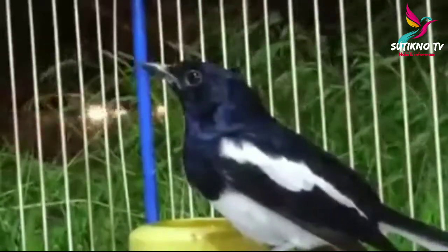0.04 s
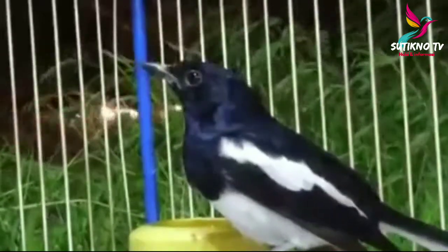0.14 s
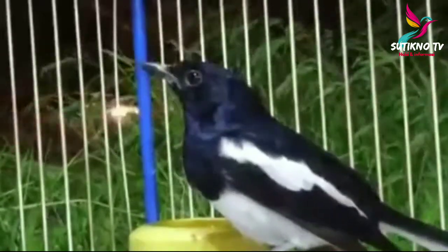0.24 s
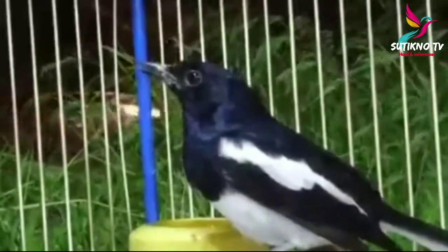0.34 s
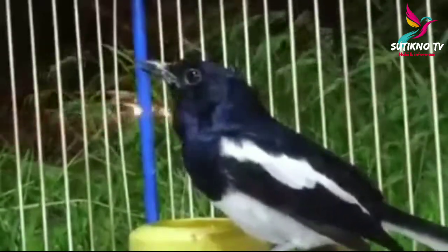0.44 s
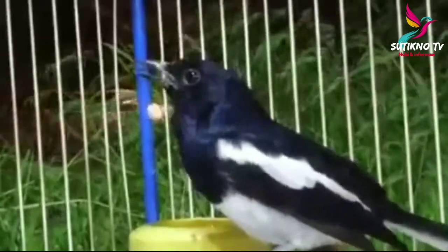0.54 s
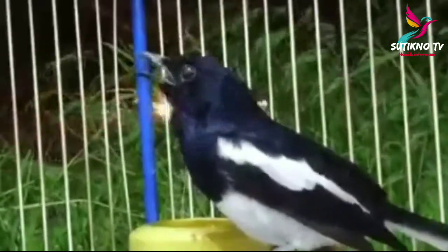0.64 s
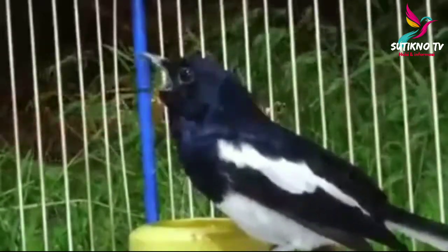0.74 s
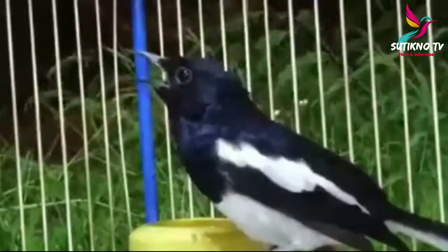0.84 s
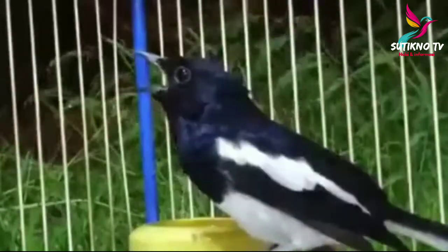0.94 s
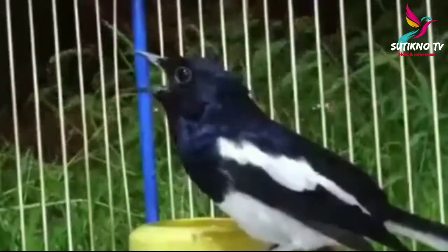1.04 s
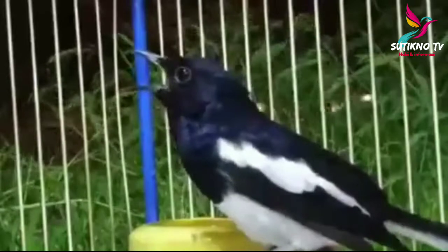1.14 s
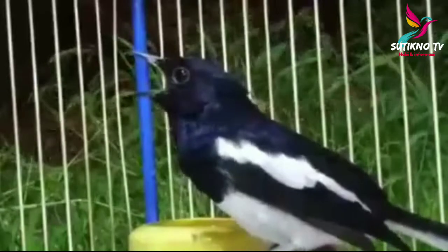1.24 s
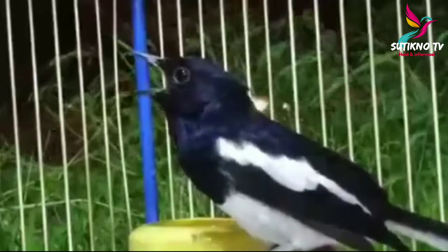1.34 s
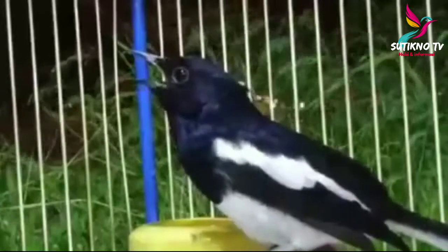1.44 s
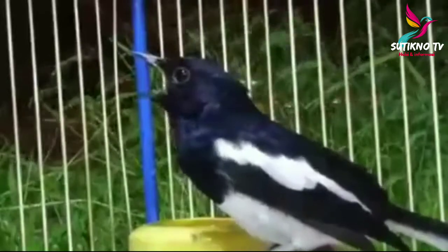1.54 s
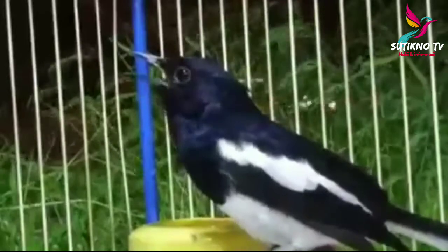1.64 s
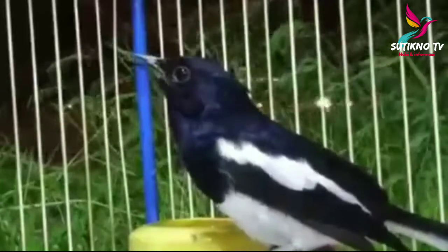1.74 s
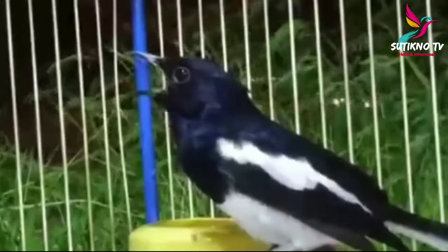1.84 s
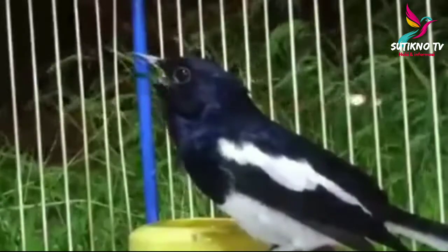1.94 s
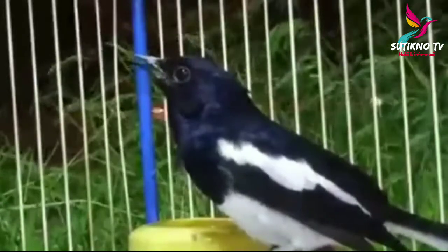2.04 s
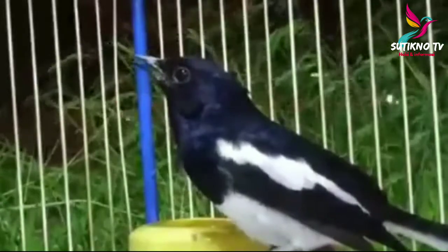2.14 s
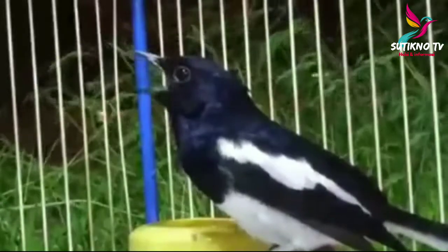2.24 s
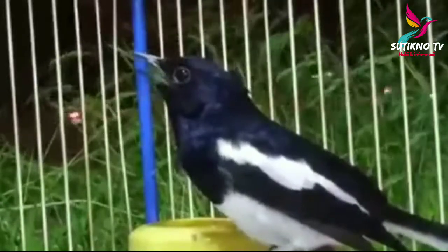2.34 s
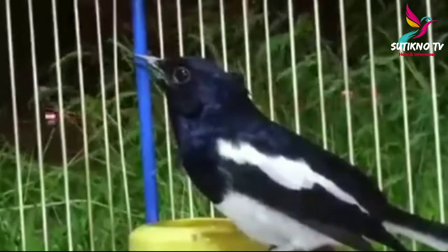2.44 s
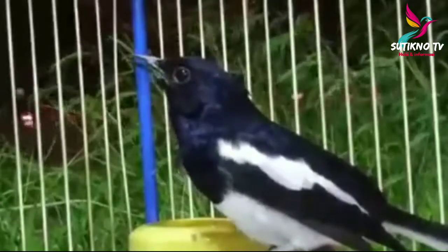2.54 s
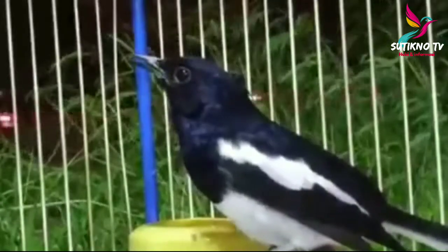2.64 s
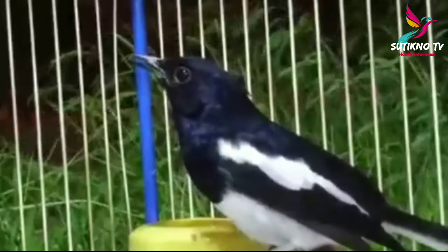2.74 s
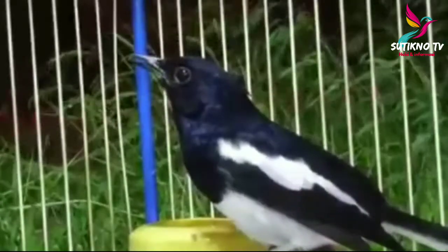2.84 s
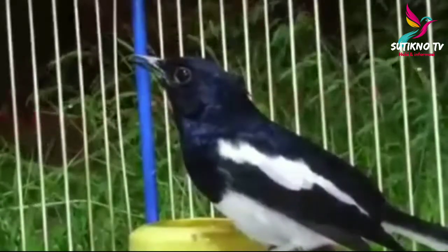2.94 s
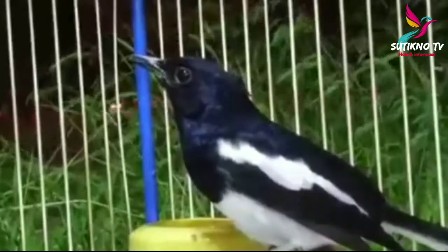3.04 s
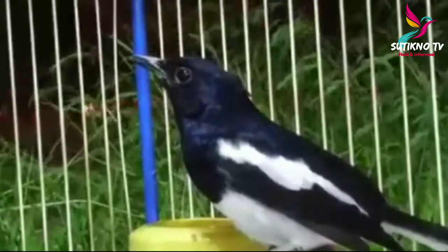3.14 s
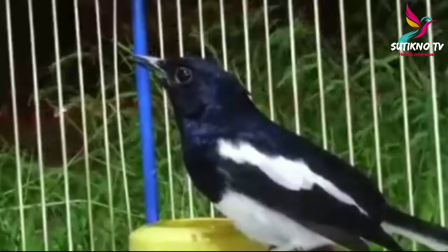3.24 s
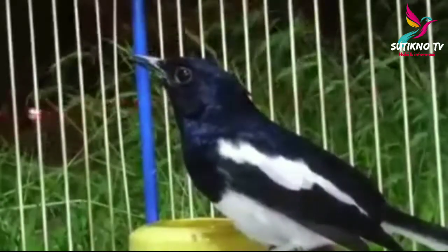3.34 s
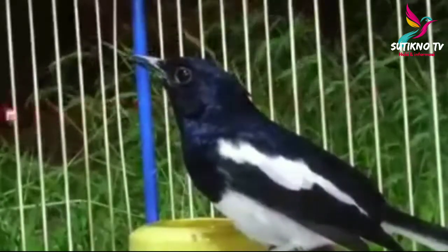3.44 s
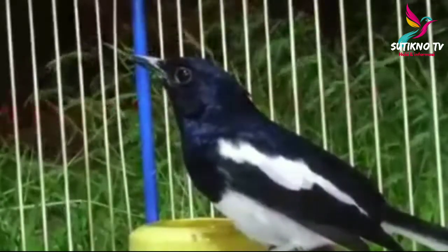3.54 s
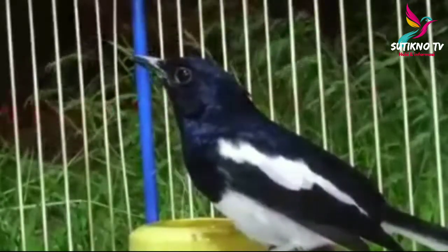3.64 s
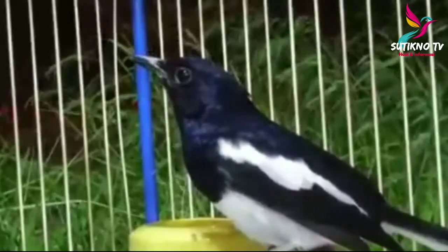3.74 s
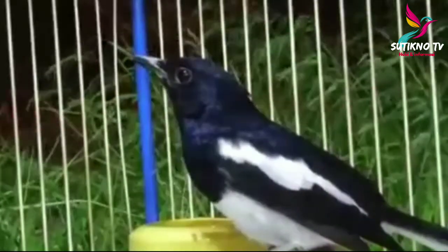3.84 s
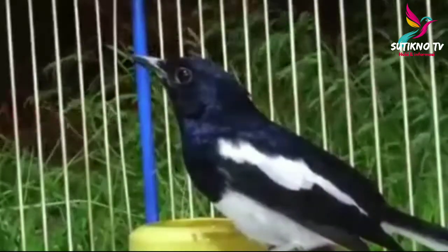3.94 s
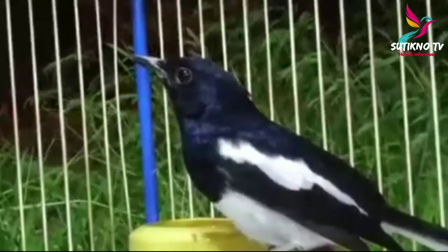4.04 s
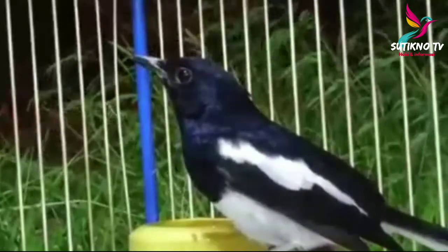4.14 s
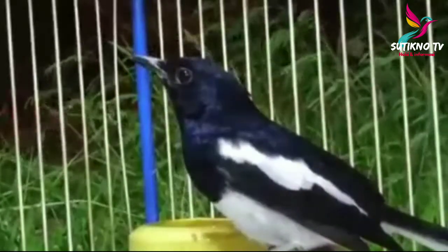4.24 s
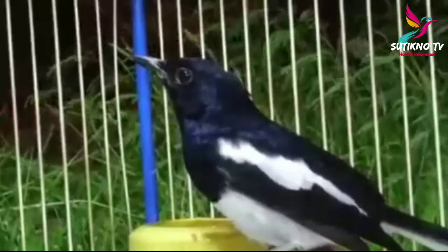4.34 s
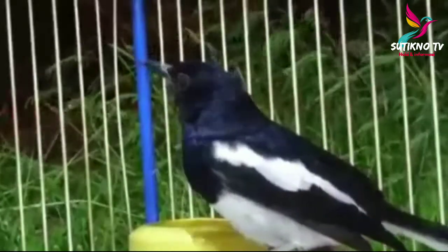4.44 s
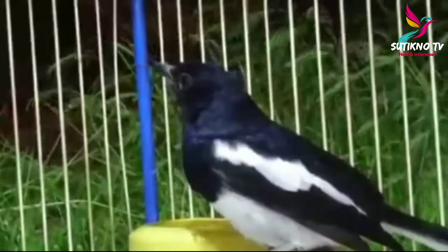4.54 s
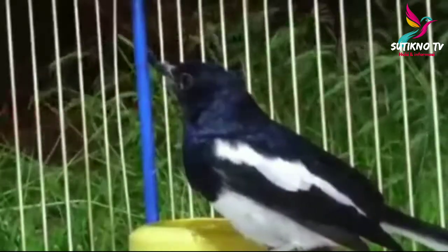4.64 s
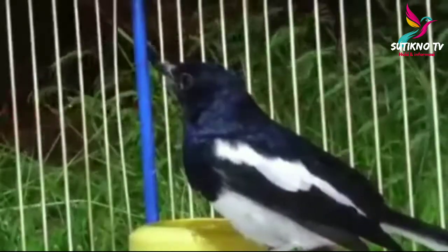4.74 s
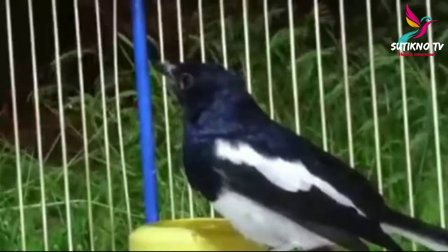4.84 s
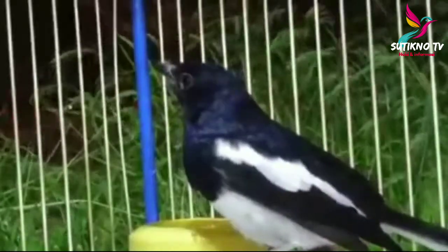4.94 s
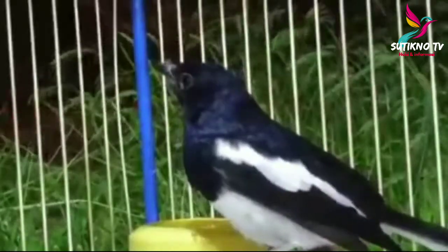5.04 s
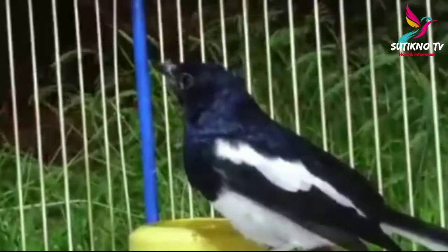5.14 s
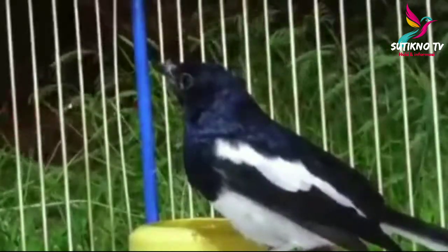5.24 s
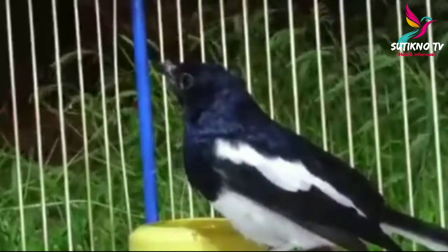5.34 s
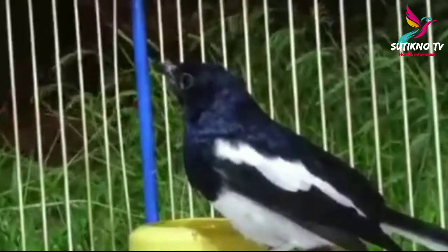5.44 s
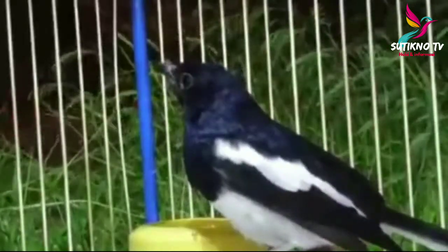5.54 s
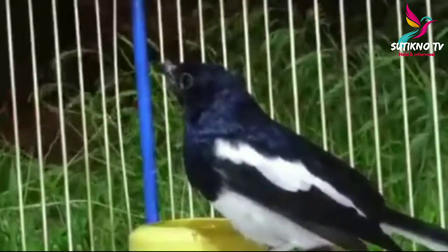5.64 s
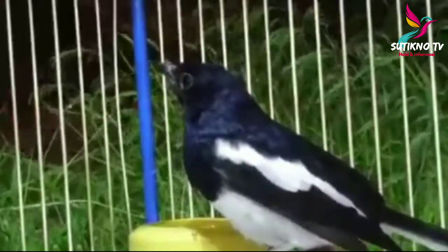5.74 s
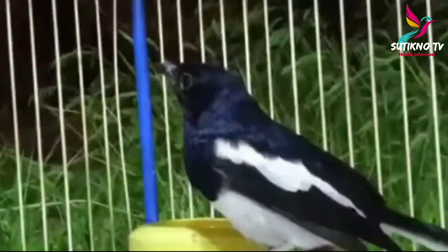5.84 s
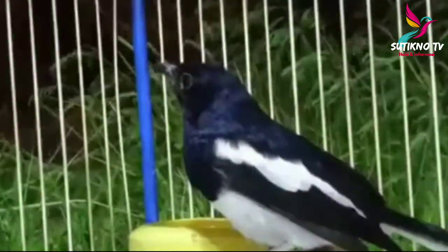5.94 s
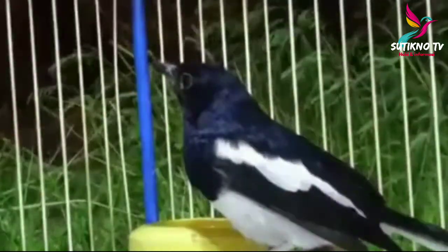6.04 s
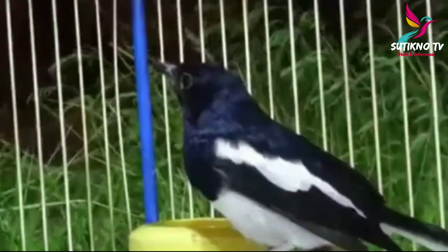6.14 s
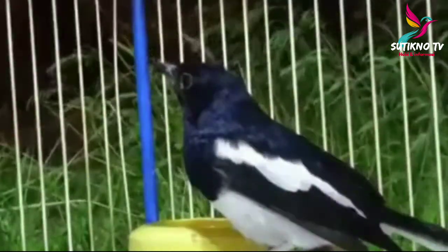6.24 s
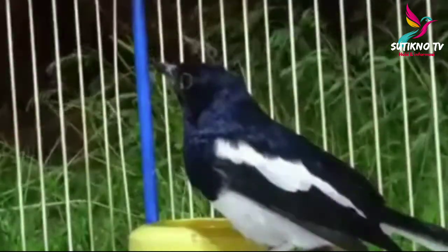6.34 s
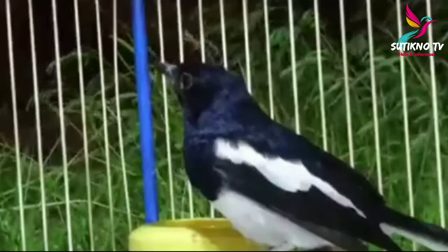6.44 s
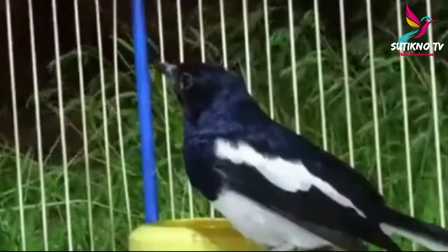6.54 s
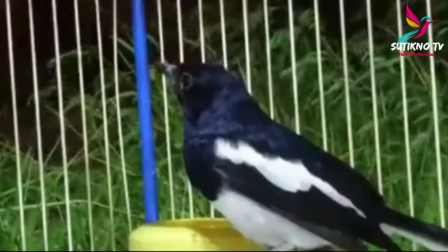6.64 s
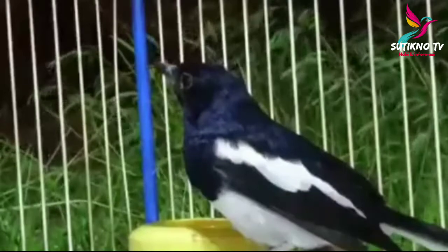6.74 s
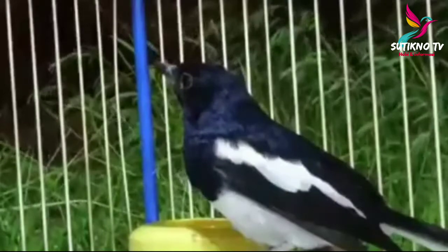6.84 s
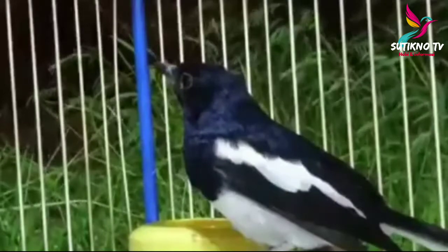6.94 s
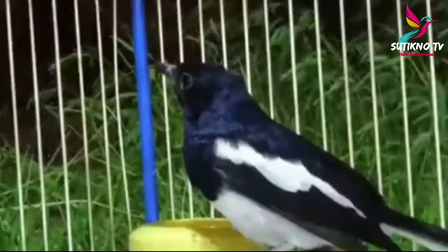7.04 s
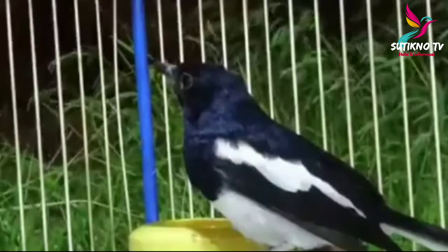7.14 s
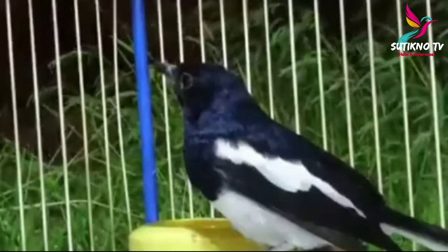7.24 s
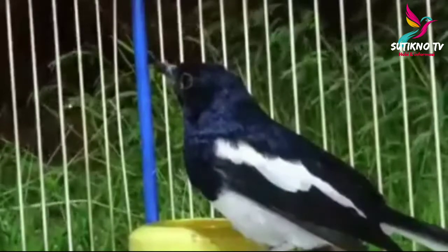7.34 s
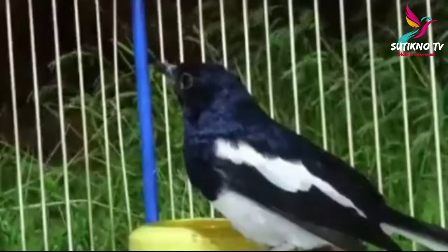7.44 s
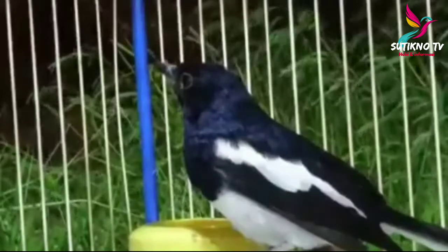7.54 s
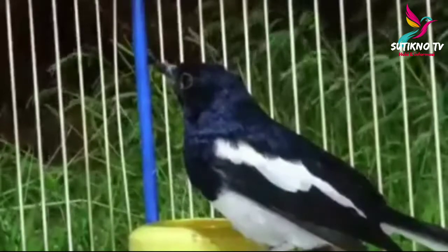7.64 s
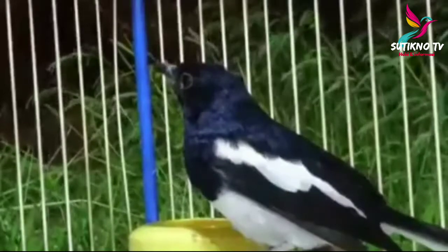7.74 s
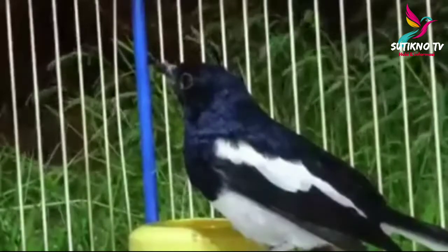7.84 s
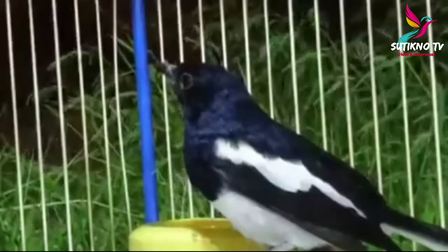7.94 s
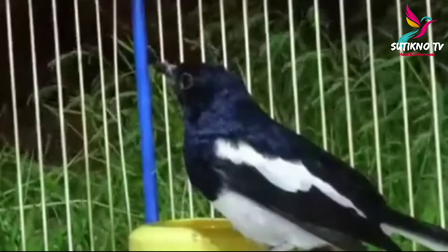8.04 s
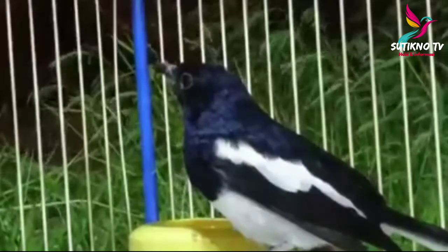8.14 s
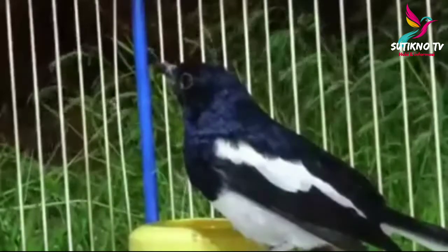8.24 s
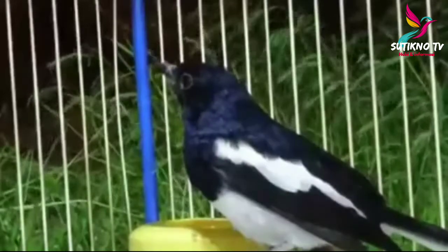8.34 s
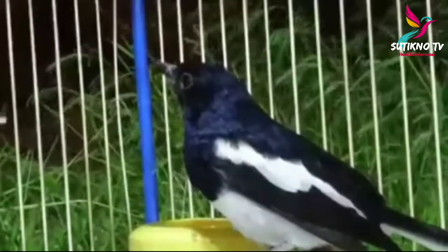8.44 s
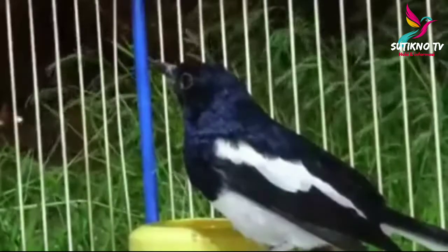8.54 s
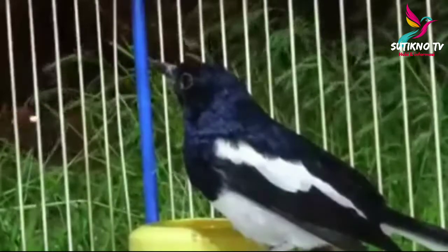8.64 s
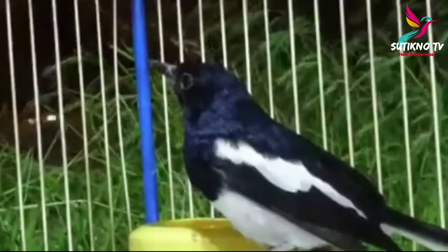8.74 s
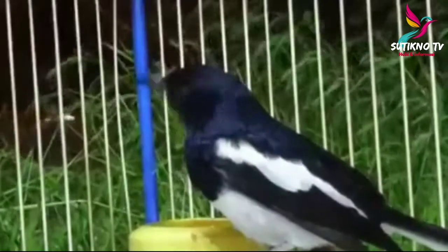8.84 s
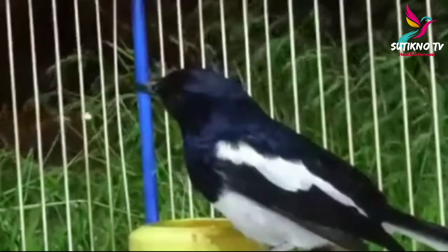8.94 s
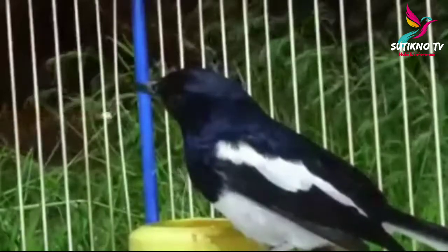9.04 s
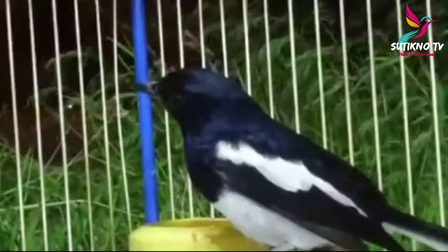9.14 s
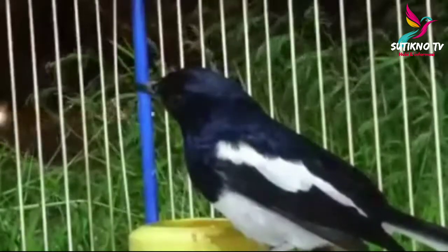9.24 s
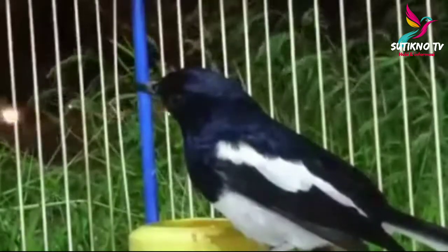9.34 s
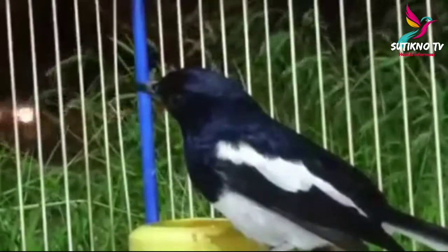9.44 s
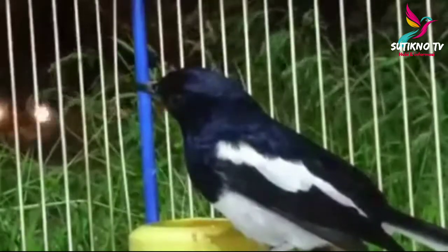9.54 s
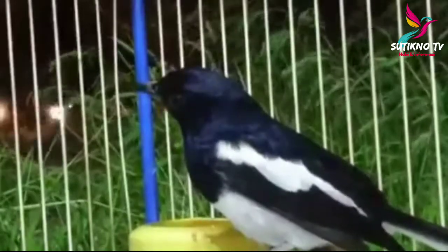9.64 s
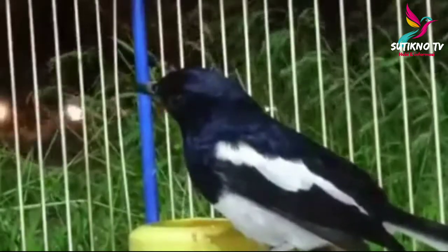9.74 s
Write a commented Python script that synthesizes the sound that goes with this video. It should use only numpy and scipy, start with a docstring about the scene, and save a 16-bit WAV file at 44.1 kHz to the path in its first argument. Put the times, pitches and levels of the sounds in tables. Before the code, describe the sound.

Outdoors among walls and leaves near a road, several birds sing with short, diffuse echoes. One near bird dominates early with piercing, rapid whistles, then stops. Softer birds carry on with gliding whistles, grainy rasps and brief buzzes, ending in quick chattering zigzags. Underneath lie lumpy low rumble and faint airy hiss. After one dull knock, a small engine's uneven puffs slowly grow nearer.

```python
"""Beside a birdcage, among walls and leaves and near a road: a caged songbird close to the microphone
sings loud whistles, chirps and one trill, built from gliding sines with harmonics. Other birds whistle,
warble, rasp and buzz all around, and walls and leaves return the notes as dying noise. Filtered noise
makes the road rumble, an early hollow drone, air and hiss. One hollow knock is two dying sines; late on,
a small single-cylinder engine putters nearer as uneven puffs ringing its exhaust."""
import sys
import numpy as np
from scipy import signal
from scipy.fft import rfft, irfft
from scipy.io import wavfile

SR = 44100
rng = np.random.default_rng(int(sys.argv[2]) if len(sys.argv) > 2 else 0)


def invert_db(x):
    """Field ratio 10**(x/20) for x, a level in decibels (scalar or array-like)."""
    u = np.asarray(x, float) / 20
    return 10 ** u


def inscribe(sig):
    """Save sig as 16-bit PCM at rate SR to the path in sys.argv[1].

    A 1-D sig is mono; a 2-D sig holds one channel per row.
    Samples are clipped to [-1, 1] before scaling.
    """
    pcm = np.round(np.clip(np.atleast_2d(sig).T, -1, 1) * 32767)
    wavfile.write(sys.argv[1], SR, pcm.astype(np.int16))


N = 432180

# All bird levels are given before the later flutter, mixing gain and echo.
# Near bird's song: (syllable, start t/s, length t/s, pitch f/Hz, peak level/dB)
SONG = [("chirp", .515, .06, 2100, -11), ("chirp", .645, .094, 2850, -6),
        ("whistle", .804, .089, 3520, -1.1), ("trill", .945, .285, 2560, -16),
        ("rise", 1.325, .053, 4430, -1.1), ("top", 1.377, .034, 5200, -9.5),
        ("sag", 1.414, .046, 4500, -14), ("droop", 1.39, .077, 3530, -12.5),
        ("snap", 1.468, .024, 3350, -2.5), ("rise", 1.587, .042, 4500, -2.1),
        ("top", 1.631, .041, 5220, -5.5), ("dip", 1.656, .063, 3760, -5.5), ("tick", 1.754, .018, 3460, -3),
        ("hook", 1.768, .042, 2850, -4), ("top", 1.872, .024, 5260, -35), ("sag", 1.885, .017, 3160, -21),
        ("rise", 1.903, .055, 4540, -1.5), ("top", 1.957, .023, 5290, -11), ("dip", 1.963, .057, 3720, -7),
        ("tick", 2.057, .019, 3200, -7.5), ("hook", 2.074, .039, 2900, -5),
        ("close", 2.265, .145, 4167, -10.1)]
# Its syllables: (2nd harmonic level/dB, 3rd harmonic level/dB,
# [(share of length, pitch ratio, level/dB relative to the peak)])
SYLLABLES = { "chirp": (-23, -28, [(0, .83, -15), (.4, .92, 0), (.73, 1, -9), (.93, .93, -17),
             (1, .92, -29)]), "whistle": (-23, -35.5, [(0, .88, -17), (.12, .95, -2), (.4, 1, 0),
             (.73, 1.001, -6), (.85, .98, -1), (.93, .93, -26), (1, .85, -30)]),
             "trill": (-4.5, -21, [(0, .9, -30), (.07, .94, -14), (.1, .965, -7), (.17, 1.005, -4),
             (.4, 1, 0), (.61, .96, -4), (.895, 1.04, -.5), (.965, .985, -9), (1, .89, -5)]),
             "rise": (-33, -44, [(0, .93, -24), (.1, .935, -12), (.3, .955, -8), (.6, .985, -2.5),
             (.8, 1.005, 0), (1, 1.05, -10)]), "top": (-36, -48, [(0, .93, -5), (.35, .97, -3), (.75, 1, 0),
             (1, .99, -18)]), "sag": (-27, -42, [(0, 1.13, -18), (.45, 1, 0), (1, .96, -8)]),
             "droop": (-5.5, -27, [(0, .935, -25), (.13, 1, 0), (.52, .885, -5.5), (1, .85, -11)]),
             "snap": (-17, -38, [(0, .93, -16), (.45, 1, 0), (.62, .96, -10), (1, .67, -14)]),
             "dip": (-10, -31, [(0, .97, -26), (.1, 1, -9), (.25, .94, -1.5), (.4, .9, -7),
             (.55, .89, -1.5), (.64, .91, -6), (.75, .96, 0), (.85, 1.01, -6), (.9, .95, -2),
             (1, .78, -18)]), "tick": (-25, -50, [(0, .96, -21), (.56, 1, 0), (1, 1.03, -20)]),
             "hook": (-34, -42, [(0, .86, -4), (.2, 1, -12), (.28, .99, -6), (.53, .835, 0), (.8, .75, -11),
             (1, .68, -12)]), "close": (-18.5, -33, [(0, .82, -11), (.04, .96, -14), (.083, 1, 0),
             (.44, .97, -4.5), (.745, .94, -23), (.88, .9, -11), (1, .92, -27)])}
# Plain whistles of other birds: (start t/s, length t/s, from f/Hz, to f/Hz, peak level/dB,
# share of length at the peak)
WHISTLES = [(.006, .09, 2420, 2330, -20.5, .1), (1.21, .18, 3060, 3130, -26, .2),
            (5.1, .045, 1900, 1950, -37, .5), (.17, .09, 2450, 2360, -23, .55),
            (.455, .07, 3520, 3880, -18, .3), (.52, .1, 3900, 3780, -24, .3),
            (.615, .055, 3750, 3330, -17, .02), (.67, .13, 3300, 3090, -16.5, .98),
            (.53, .06, 2590, 2950, -29, .6), (.58, .07, 2930, 2580, -28, .6),
            (.89, .11, 3040, 2900, -20.5, .02), (1.03, .07, 1850, 1770, -36, .4),
            (1.34, .06, 2370, 2260, -37, .5), (1.41, .03, 2150, 1840, -27, .98),
            (1.75, .17, 1680, 1635, -36, .3), (2.47, .03, 2050, 1900, -30, .3),
            (2.88, .2, 2880, 2930, -34, .3), (3.14, .08, 4100, 4050, -42, .1),
            (2.46, .22, 1470, 1410, -41, .8), (2.8, .04, 1950, 2830, -27, .6),
            (2.84, .24, 3000, 3130, -33, .6), (2.9, .18, 3200, 3270, -34, .6),
            (2.94, .14, 1850, 1888, -28, .9), (2.94, .15, 1300, 1320, -36, .6),
            (3.19, .17, 1320, 1355, -36, .3), (3.26, .04, 2350, 2500, -23, .7),
            (3.298, .028, 2500, 3800, -24, .3), (3.39, .14, 3770, 3820, -41, .2),
            (3.37, .15, 2150, 2130, -37, .4), (3.52, .09, 1870, 1871, -34, .7),
            (3.79, .08, 1290, 1400, -30, .6), (4.26, .12, 4140, 4100, -38, .35),
            (5.05, .05, 2830, 2800, -33, .02), (5.49, .04, 1510, 1580, -37, .5),
            (5.665, .04, 3550, 3680, -27, .4), (5.7, .08, 2925, 3190, -21, .6),
            (5.77, .06, 3180, 3080, -23, .02), (5.77, .16, 2466, 2260, -25, .3),
            (5.93, .02, 2260, 2490, -22, .98), (5.9, .1, 2990, 3090, -20.5, .02),
            (5.97, .09, 2050, 2015, -22, .2), (6.09, .06, 2030, 2035, -36, .98),
            (6.03, .09, 2980, 3030, -22, .1), (6.25, .11, 2270, 2200, -30, .6),
            (6.42, .07, 2780, 2850, -31, .3), (6.27, .18, 1910, 1911, -36, .55),
            (6.42, .055, 3620, 3940, -37, .6), (6.57, .07, 2050, 1570, -32, .8),
            (6.58, .07, 1856, 2300, -24, .4), (6.65, .22, 2330, 2290, -28, .6),
            (6.7, .15, 1750, 1880, -31, .6), (6.53, .06, 2600, 1800, -33, .7),
            (6.92, .05, 1950, 2544, -25, .98), (6.97, .11, 2544, 2583, -23, .3),
            (7.03, .12, 2900, 3050, -33, .55), (6.97, .1, 1950, 2370, -36, .8),
            (7.069, .031, 2370, 2157, -28, .98), (7.1, .07, 2490, 2300, -35, .15),
            (7.22, .06, 2750, 3330, -24, .4), (7.27, .19, 3300, 3620, -25, .7),
            (7.45, .16, 3620, 3640, -33, .1), (7.4, .11, 2720, 2500, -26, .7),
            (7.5, .04, 2500, 1980, -25, .6), (7.44, .05, 1920, 1600, -35, .02),
            (7.55, .05, 1145, 1280, -33, .2), (7.864, .056, 2350, 2170, -34, .9),
            (7.915, .1, 2980, 3260, -19, .45), (5.665, .05, 1800, 1780, -38, .3)]
# Notes whose pitch swings up and down: same columns as the plain whistles
WARBLES = [(2.1, .1, 2150, 2050, -20.5, .02), (2.262, .05, 2300, 2500, -23, .5),
           (2.335, .045, 2400, 2500, -24, .6), (4.53, .21, 2000, 1950, -27, .2),
           (4.58, .16, 2350, 2650, -27, .3), (4.62, .12, 3000, 3050, -29, .8),
           (5.84, .24, 2250, 2350, -27, .4), (7.5, .16, 2350, 2500, -25, .2),
           (9.246, .065, 3400, 3100, -25, .55)]
# Raspy notes: same columns again
RASPS = [(.13, .05, 2500, 2750, -27, .5), (.26, .04, 2520, 3000, -25, .7), (.47, .03, 3900, 4850, -23, .05),
         (.92, .03, 3750, 3940, -29, .45), (1.24, .14, 3110, 3145, -27, .5),
         (2.2, .02, 3100, 3050, -22, .1), (2.21, .05, 2600, 2300, -24, .1),
         (2.395, .04, 3100, 3200, -27, .3), (2.23, .12, 1350, 1400, -39, .5),
         (3.43, .16, 3020, 3090, -36, .52), (3.6, .09, 3800, 2250, -29, .4),
         (3.7, .15, 2840, 2780, -36, .02), (3.92, .19, 2950, 3200, -39, .7),
         (4.76, .25, 3030, 3120, -24, .38), (4.75, .25, 2730, 2480, -30, .15),
         (4.78, .15, 3625, 3570, -35, .35), (5.2, .05, 1750, 2400, -19, .5),
         (5.27, .07, 2000, 2100, -33, .5), (5.42, .07, 2200, 2450, -33, .5),
         (5.51, .07, 3100, 3000, -34, .5), (6.23, .16, 3200, 3000, -35, .5),
         (6.34, .1, 2000, 2800, -29, .5), (6.67, .07, 4600, 3600, -45, .3),
         (7.25, .14, 2900, 3200, -27, .5), (7.17, .09, 2200, 2650, -27, .5), (6.6, .1, 2100, 2200, -29, .4),
         (7.56, .07, 3250, 2900, -29, .7), (7.67, .08, 1800, 1990, -35, .4),
         (7.72, .08, 4500, 2870, -42, .75), (7.82, .1, 2520, 2281, -40, .7),
         (8.06, .12, 2800, 2550, -37, .5), (8.36, .17, 2650, 2300, -32, .45),
         (8.8, .14, 2700, 2300, -31, .6), (8.18, .1, 3150, 3160, -36, .2)]
# Buzzy notes with pitch shaken fast: (start t/s, end t/s, centre f/Hz, basic swing f/Hz, level/dB)
BUZZES = [(2.474, 2.51, 3100, 170, -35), (2.62, 2.663, 3100, 170, -33), (2.76, 2.815, 3100, 120, -35),
          (3.082, 3.115, 3050, 250, -31), (2.75, 2.8, 2300, 450, -38), (3.238, 3.263, 2900, 650, -37),
          (4.633, 4.733, 5370, 1450, -37.5), (6.869, 6.96, 5260, 910, -47), (8.057, 8.174, 3180, 330, -33),
          (8.334, 8.467, 3170, 330, -32), (8.787, 8.904, 3156, 325, -32), (9.24, 9.32, 5030, 350, -45),
          (9.377, 9.478, 5120, 350, -49), (9.52, 9.6, 4900, 400, -47), (9.665, 9.75, 5060, 350, -53)]
# Figures of other birds, some sung once, some several times:
# [(share of length, pitch ratio, level/dB relative to the peak)]
FIGURES = {"hold": [(0, 1.02, -14), (.2, 1.01, -3), (.55, .995, -5), (.85, 1, 0), (.92, 1.005, -8),
           (1, 1.02, -25)], "arch": [(0, .74, -18), (.12, .88, 0), (.27, .965, -3), (.56, 1, -1),
           (1, .945, -4)], "dive": [(0, 1.45, -22), (.1, 1.12, -6), (.2, 1.01, 0), (.5, 1, -6),
           (1, .99, -22)], "slur": [(0, 1.5, -16), (.3, 1.3, -8), (.7, 1.08, 0), (1, 1, -12)],
           "fall": [(0, 1, -3), (.14, .96, 0), (.36, .73, -8), (.55, .58, -11), (1, .525, -14)],
           "answer": [(0, 1.01, -3), (.12, 1, 0), (.35, .955, -6), (.85, .945, -12), (1, .94, -22)],
           "swoop": [(0, 1.2, -.5), (.2, 1.03, -8), (.55, 1.03, -11), (.85, 1.3, -1.5), (1, 1.42, 0)],
           "climb": [(0, .74, -6), (.3, .77, -3), (.62, .97, 0), (1, 1, -14)], "curl": [(0, .72, -10),
           (.17, 1, 0), (.5, .93, -3), (1, .88, -14)], "chatter": [(0, .6, -8), (.06, .73, 0),
           (.19, .55, -4), (.3, .53, -6), (.39, .7, -3), (.47, .62, -4), (.62, 1, -5), (.72, .84, -4),
           (.83, .97, -10), (1, .85, -16)], "zigzag": [(0, 1, -4), (.08, .97, -4), (.2, .8, 0),
           (.32, .97, -8), (.46, .75, -3), (.6, .97, -7), (.76, .8, -12), (.9, .96, -14), (1, .88, -22)]}
# When they are sung: (figure, start t/s, length t/s, pitch f/Hz, peak level/dB)
FAR_FIGURES = [("hold", .02, .37, 3160, -16.5), ("arch", 4.33, .235, 3750, -19.5),
               ("climb", 2.495, .085, 3180, -24), ("swoop", 2.61, .08, 1920, -24),
               ("swoop", 2.84, .139, 1780, -28), ("swoop", 3.065, .08, 1800, -26),
               ("fall", 3.6, .2, 2260, -29), ("answer", 3.955, .32, 1510, -29),
               ("fall", 4.35, .29, 2290, -25), ("answer", 4.73, .25, 1510, -26.5),
               ("fall", 5.14, .24, 2360, -26), ("answer", 5.67, .15, 1500, -36),
               ("dive", 6.48, .12, 2960, -25), ("dive", 6.82, .19, 3000, -20.5),
               ("slur", 7.99, .06, 2900, -21), ("slur", 8.283, .065, 2800, -17),
               ("slur", 8.732, .063, 2830, -16.5), ("chatter", 9.243, .132, 3120, -23),
               ("curl", 5.337, .09, 2620, -23), ("zigzag", 9.39, .09, 3620, -20.5),
               ("zigzag", 9.533, .092, 3460, -25), ("zigzag", 9.666, .104, 3440, -25)]
# Engine over time: (t/s, average firings per s, level/dB)
ENGINE = [(5.6, 29.5, -42), (6.5, 30.0, -37), (7.25, 30.5, -33), (8.14, 30.3, -38), (8.7, 29.5, -33),
          (9.8, 28.7, -28.5)]
# Exhaust resonances: (f/Hz, width f/Hz, level/dB)
EXHAUST = [(400, 193, 1), (627, 127, 1.5), (1000, 220, -4)]
# Tones of the hollow knock: (f/Hz, relative level/dB, time to fall by 60 dB t/s)
KNOCK = [(680, 1.5, 0.019), (960, -17.5, 0.07)]
# Background over time: (t/s, rumble level/dB before swells and drift, hiss gain/dB before drift)
BACKGROUND = [(0.0, -22, -55), (1.0, -21, -54), (1.7, -23.5, -54), (2.4, -22.5, -53), (3.2, -27, -57),
              (4.2, -25, -58), (5.0, -29, -56.5), (5.45, -28, -59), (5.7, -27, -65), (7.7, -31.5, -67),
              (8.6, -30.5, -69), (9.8, -26.5, -65)]
# Colour of the rumble: (f/Hz, relative level/dB per Hz)
RUMBLE_COLOUR = [(18, -44), (30, -35.5), (68, -8), (152, 0), (213, -7.5), (440, -18), (628, -20.5),
                 (1090, -31), (1200, -32), (1560, -38), (2640, -120)]
# Brief swells of the rumble: (centre t/s, spread to each side t/s, rise level/dB)
SWELLS = [(0.785, 0.028, 7.5), (1.274, 0.057, 6.5), (5.896, 0.058, 4.5), (6.353, 0.074, 6.5),
          (8.8, 0.047, 9)]
# Colour of the air noise: (f/Hz, relative level/dB per Hz)
AIR_COLOUR = [(590, -30.5), (1000, -3), (1760, -6), (3020, -5.5), (4200, -20), (7270, -15.5), (8300, -28.5),
              (10800, -59), (18300, -120)]


def near_bird():
    """Clean whistles with weak harmonics; each trill flick lifts the pitch and chokes the tone."""
    k = np.arange(7)
    flick_s = 0.992 + k * (0.0225 - 0.0004 * k)   # the flicks come ever faster
    flicks = bumps(flick_s, 0.0026).sum(axis=0)
    shake_hz = 32 * drift(320) + 190 * flicks
    voice = np.zeros(N)
    for name, *note in SONG:
        second_db, third_db, shape = SYLLABLES[name]
        harmonics_db = [0, second_db, third_db, third_db - 15, third_db - 18]
        add(voice, sung(shape, *note), shake_hz, harmonics_db, edge_s=0.0034)
    voice = voice * invert_db(-7 * flicks)
    # the two voices mix into sum tones; the high-pass removes the slow part of the square
    high_pass = signal.butter(2, 1200, "high", fs=SR, output="sos")
    voice = voice + 0.13 * signal.sosfilt(high_pass, voice ** 2)
    return voice + invert_db(-16.5) * echoes(voice, t60_s=0.31, gap_s=0.0074)


def far_birds():
    """Grainy whistles, warbles, rasps and buzzes that flutter on their way, with much more echo."""
    whistles, rough, clear = np.zeros((3, N))
    shake = drift(146.4)
    waver_hz = 24 * shake
    # the throat beats almost regularly
    pulse = np.sin(2 * np.pi * np.cumsum(95 + 12 * drift(17)) / SR)

    notes = [glide(*row) for row in WHISTLES]
    notes += [sung(FIGURES[name], *note) for name, *note in FAR_FIGURES]
    for rows in notes:
        # the loudest whistlers sit nearer: purer tone, less echo
        near = np.max(rows[:, 2]) > -20.2
        target, steadiness = (clear, 0.4) if near else (whistles, 1)
        add(target, rows, waver_hz * steadiness, [0, -37, -40], edge_s=0.005)
    for row in WARBLES:
        swing = np.sin(2 * np.pi * 42 * (np.arange(N) / SR - row[0]))   # 42 swings per second
        add(whistles, glide(*row), 200 * swing + waver_hz, [0, -30, -34], edge_s=0.005)
    for row in RASPS:
        add(rough, glide(*row), 110 * pulse + 90 * shake, [0, -30, -34], edge_s=0.005)
    for start, end, hz, swing_hz, level_db in BUZZES:
        rows = [(start, hz, level_db), (end, hz, level_db)]
        add(rough, rows, swing_hz * (0.95 * pulse + 0.5 * drift(413)), [0], edge_s=0.0067)

    whistles = whistles * invert_db(2.5 * drift(30) + 1.8 * drift(110) + 1.3)   # slow flutter and fine grain
    rough = rough * invert_db(1.63 * pulse + 2.8 * drift(72) + 2.0)
    clear = clear * invert_db(1.2 * drift(25) + 2.5)
    sent_to_echo = whistles + rough + invert_db(-4) * clear
    return whistles + rough + clear + invert_db(-5.5) * echoes(sent_to_echo, t60_s=0.26, gap_s=0.0062)


def engine():
    """One uneven puff of noisy pressure per firing rings the resonances of the exhaust."""
    per_s, level_db = in_time(ENGINE)
    turns = np.cumsum(per_s + 1.3 * drift(8)) / SR
    fired = np.diff(np.floor(turns + 0.3), prepend=0) > 0
    kicks = fired * invert_db(2.3 * rng.standard_normal(N))
    puffs = signal.lfilter([1], [1, -0.97], kicks) * (1 + 0.4 * rng.standard_normal(N))
    pipe = np.zeros(N)
    for k, (hz, width_hz, db) in enumerate(EXHAUST):
        pipe += invert_db(db) * resonance(puffs, hz, width_hz) * (-1) ** k   # every other one is flipped
    pipe = pipe + invert_db(-4) * echoes(pipe, t60_s=0.17, gap_s=0.0029)
    running = np.arange(N) > ENGINE[0][0] * SR
    return invert_db(level_db) * running * rms_one(pipe)


def knock():
    """A single blow on something hollow: two tones start together and die away."""
    t = np.maximum(np.arange(N) / SR - 5.559, 0)   # seconds since the blow
    blow = np.zeros(N)
    for hz, db, t60_s in KNOCK:
        blow += invert_db(-7 + db - 60 * t / t60_s) * np.sin(-2 * np.pi * hz * t)
    return blow + invert_db(-5.5) * echoes(blow, t60_s=0.15, gap_s=0.012)


def road_rumble():
    """Low coloured noise whose level drifts lumpily and swells briefly."""
    rumble_db, _ = in_time(BACKGROUND)
    s, spread_s, rise_db = np.transpose(SWELLS)
    return invert_db(rumble_db + rise_db @ bumps(s, spread_s) + 1.65 * drift(6)) * coloured(RUMBLE_COLOUR)


def hollow_drone():
    """Noise through one broad low resonance, dying out early on."""
    drone = rms_one(resonance(rng.standard_normal(N), 520, 500))
    end_s, fade_s = 0.3, 0.05
    past_end = np.minimum((np.arange(N) / SR - end_s) / fade_s, 60)   # 60 keeps exp() in range
    return invert_db(-30) * drone / (1 + np.exp(past_end))


def air_noise():
    """Nearly steady noise in the middle pitches."""
    return invert_db(-41 + 1.5 * drift(1.3)) * coloured(AIR_COLOUR)


def top_hiss():
    """Faint high-passed noise with a peak near the top, its level drifting."""
    _, hiss_db = in_time(BACKGROUND)
    high_pass = signal.butter(6, 8800, "high", fs=SR, output="sos")
    hiss = signal.sosfilt(high_pass, rng.standard_normal(N))
    peak = resonance(hiss, 14600, 1500)
    return invert_db(hiss_db + 2.6 * drift(9)) * (hiss + invert_db(-1.5) * peak)


def sung(shape, start, length, hz, level_db):
    """A shape stretched to one note: rows (t/s, f/Hz, level/dB)."""
    return np.array(shape) * [length, hz, 1] + [start, 0, level_db]


def glide(start, length, from_hz, to_hz, level_db, share):
    """A straight glide that swells to its peak and dies away: rows (t/s, f/Hz, level/dB)."""
    u = np.array([0, np.clip(share, 0.01, 0.99), 1])
    # slopes: a rise of 15 dB or a fall of 18 dB if it took the whole length
    below_peak_db = np.array([15 * u[1], 0, 18 * (1 - u[1])])
    return np.transpose([start + length * u, from_hz + (to_hz - from_hz) * u, level_db - below_peak_db])


def add(out, rows, shake_hz, harmonics_db, edge_s):
    """Adds one note: a sine and its harmonics glide along the rows, pitch shaken, ends faded."""
    s, hz, level_db = np.transpose(rows)
    n = np.arange(max(int((s[0] - edge_s) * SR), 0), min(int((s[-1] + edge_s) * SR), N))
    t = n / SR
    phase = 2 * np.pi * np.cumsum(np.interp(t, s, hz) + shake_hz[n]) / SR
    fade = np.clip(np.minimum(t - s[0], s[-1] - t) / (2 * edge_s) + 0.5, 0, 1)
    tone = sum(invert_db(db) * np.sin((k + 1) * phase) for k, db in enumerate(harmonics_db))
    # the root of 2 makes the level count as rms
    out[n] += np.sqrt(2) * invert_db(np.interp(t, s, level_db)) * fade * tone


def echoes(x, t60_s, gap_s):
    """Dense reflections of unit energy: a dying noise that sets in after a gap."""
    t = np.arange(SR) / SR
    tail = rng.standard_normal(SR) * invert_db(-60 * t / t60_s) * (t > gap_s)
    return signal.fftconvolve(x, tail / np.sqrt(np.sum(tail ** 2)))[:N]


def bumps(times, widths):
    """Bell-shaped bumps of height 1, one row each."""
    distance = np.arange(N) / SR - np.reshape(times, (-1, 1))
    return np.exp(-0.5 * (distance / np.reshape(widths, (-1, 1))) ** 2)


def in_time(rows):
    """Columns of a table after the time, one value per sample."""
    s, *columns = np.transpose(rows)
    return [np.interp(np.arange(N) / SR, s, c) for c in columns]


def rms_one(x):
    """Scales a sound to an rms of 1."""
    return x / np.sqrt(np.mean(x ** 2) + 1e-20)


def drift(rate_hz):
    """Random wandering of rms 1: noise twice through a one-pole low-pass."""
    r = np.exp(-2 * np.pi * rate_hz / SR)
    wander = signal.lfilter([1], [1, -2 * r, r * r], rng.standard_normal(N + SR))
    return rms_one(wander[SR:])   # the first second lets the filter settle


def coloured(spectrum):
    """Noise of rms 1 with the given spectrum."""
    hz, level_db = np.transpose(spectrum)
    log_hz = np.log(np.arange(1, N // 2 + 2) * SR / N)
    gain = invert_db(np.interp(log_hz, np.log(hz), level_db))
    return rms_one(irfft(rfft(rng.standard_normal(N)) * gain, N))


def resonance(x, hz, width_hz):
    """Two-pole resonance, gain about 1 at its peak."""
    r = np.exp(-np.pi * width_hz / SR)
    feedback = [1, -2 * r * np.cos(2 * np.pi * hz / SR), r * r]
    return signal.lfilter([(1 - r * r) / 2, 0, (r * r - 1) / 2], feedback, x)


def scene():
    """Everything reaches one microphone."""
    birds = near_bird() + far_birds()
    background = road_rumble() + hollow_drone() + air_noise() + top_hiss()
    return (birds + engine() + knock() + background)[None]


def roll_off(x):
    """The treble ends steeply here."""
    return signal.sosfilt(signal.butter(12, 15570, fs=SR, output="sos"), x)


def record(dry):
    """The loudest notes overload the input, which cuts off their peaks."""
    overloaded = np.clip(dry, -1, 1)
    return roll_off(overloaded)


dry = scene()
out = record(dry)
inscribe(out)
```